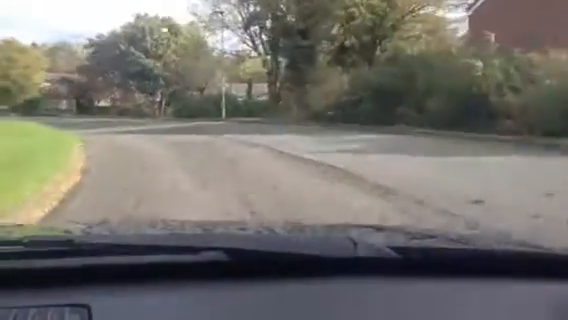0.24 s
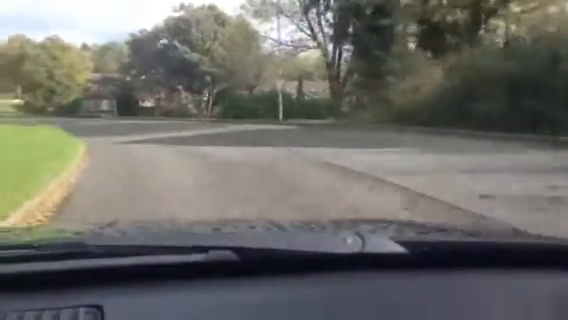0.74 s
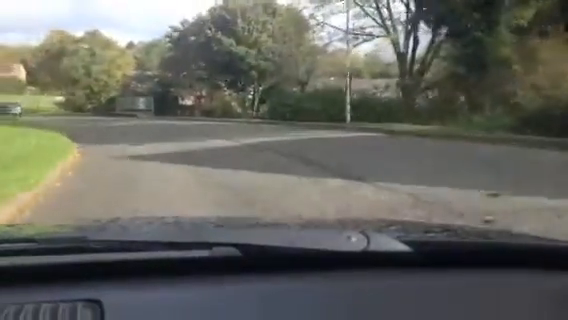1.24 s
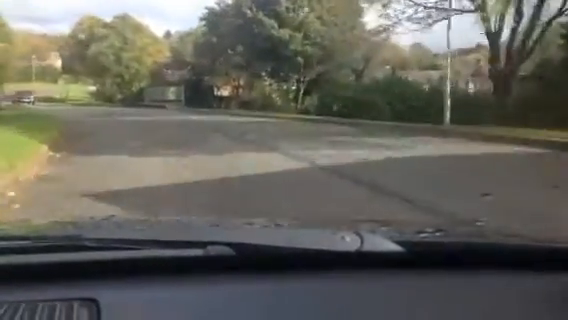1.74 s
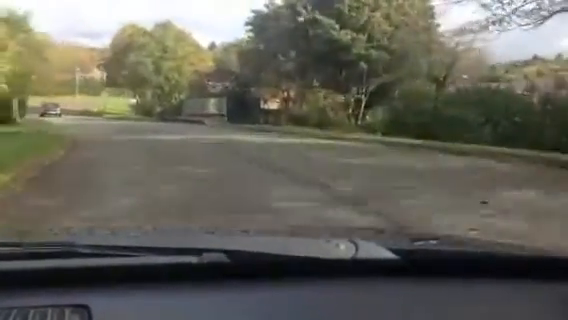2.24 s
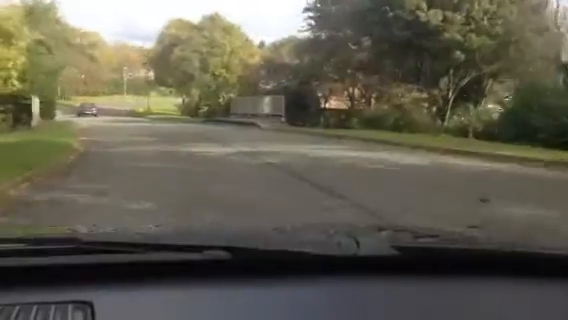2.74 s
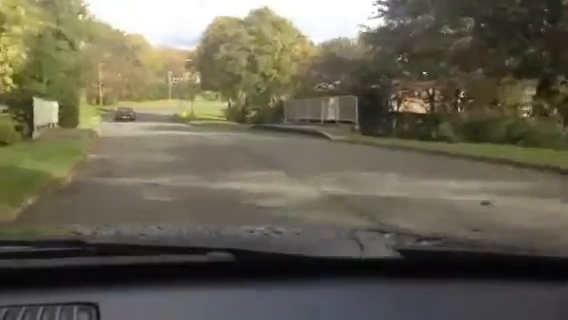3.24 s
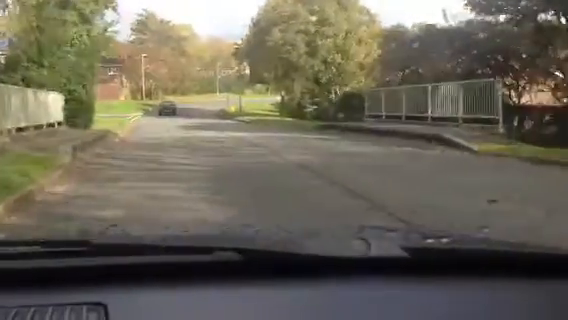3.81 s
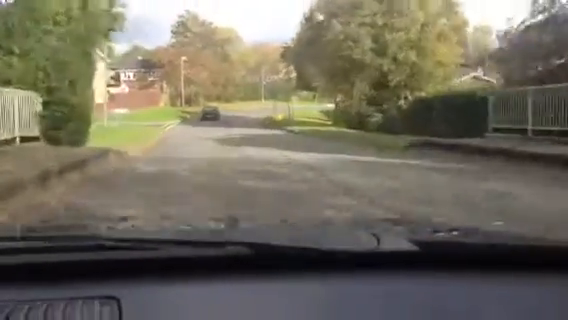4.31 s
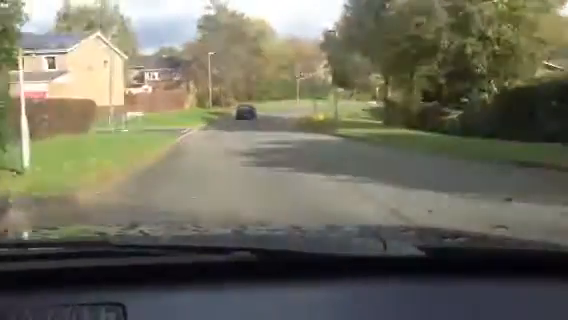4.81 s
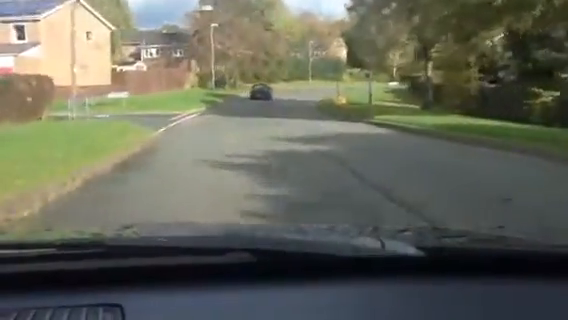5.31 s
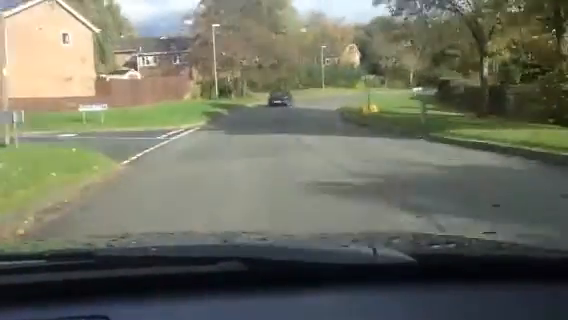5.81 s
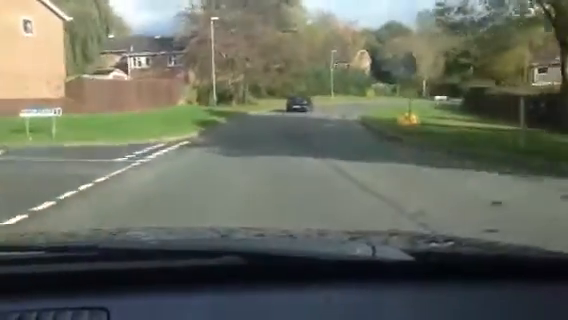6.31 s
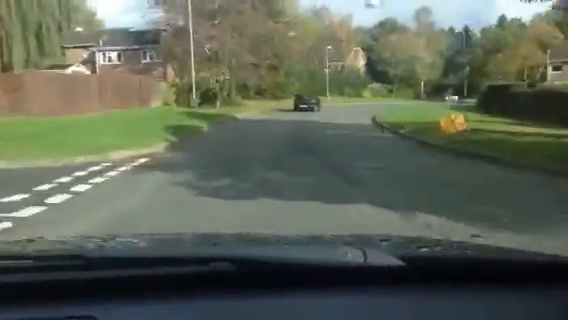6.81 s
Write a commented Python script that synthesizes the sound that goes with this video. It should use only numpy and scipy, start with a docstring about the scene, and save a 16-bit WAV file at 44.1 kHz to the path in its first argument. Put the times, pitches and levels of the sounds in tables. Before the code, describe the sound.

Inside a diesel car, close behind the dashboard, in one bass-heavy channel with faint steady hiss. From 0 to 1.5 s a throbbing low boom and tyre drumming dominate as the car rounds a bend, with soft rasps, dull taps and round thuds. Road noise surges near 1.6 s, a sharp tiny trim click comes at 1.75 s and a strong thud at 1.9 s; then the rumble eases. A thin breathy turbo whistle creeps up until 2.3 s, dips, then climbs steeply from 2.9 to 4.3 s with airy hiss, while the engine hum rises in pitch and growls. Thuds and a brighter click cluster around 4.1-4.7 s. The whistle slides down, flaring around 5.2 s, and fades by about 5.8 s, as a panel buzzes with the clattering engine. Load and pitch ease slightly to 7 s, with light rustles, seam thuds at 6.5 and 7 s, and a late dull tap.

```python
"""One hears tyres drumming a car cabin and thudding over seams, a diesel's hum and clatter, and a turbo
whistle that climbs and falls away, with taps, rasps, rustles and trim clicks close by. The car is a
turbodiesel gathering speed on a suburban road. Road, growl and hiss are shaped noise, the hum is a sum of
sines locked to the firings, the whistle is narrow noise on a moving pitch, and thuds are brief low cosines."""
import sys
import numpy as np
from scipy.fft import rfft, irfft, next_fast_len
from scipy.io import wavfile
from scipy.ndimage import uniform_filter1d, map_coordinates

SR = 44100
rng = np.random.default_rng(int(sys.argv[2]) if len(sys.argv) > 2 else 0)


def wav_out(sig):
    """Save sig, one row per channel (or a flat mono array), as 16-bit PCM at SR to the path in sys.argv[1]."""
    wavfile.write(sys.argv[1], SR, np.round(np.clip(np.atleast_2d(sig).T, -1, 1) * 32767).astype(np.int16))


N = 311346  # length in samples


def amp(db):
    """Level law: decibels to amplitude ratio."""
    return 10 ** (np.asarray(db) / 20)


def unit(x):
    """Normalization: scale to rms 1."""
    return x / np.sqrt(np.mean(x ** 2) + 1e-20)


def curves(rows):
    """Linear interpolation: one value per sample for each column after the time."""
    s, *columns = np.transpose(rows)
    return [np.interp(np.arange(N) / SR, s, column) for column in columns]


def wobble(rate):
    """Band-limited fluctuation: a smooth random curve of rms 1 through rate knots a second."""
    knots = rng.standard_normal(int(N * rate / SR) + 4)
    return unit(map_coordinates(knots, [np.arange(N) * rate / SR]))


def filtered(x, response):
    """Linear filtering: multiply the spectrum of x by a response of frequency."""
    m = next_fast_len(N + SR // 2)  # padded so that ringing does not wrap round
    return irfft(rfft(x, m) * response(np.fft.rfftfreq(m, 1 / SR)), m)[:N]


def colour(x, spectrum):
    """Spectral shaping: x through a (Hz, dB) curve, falling steeply beyond its last point, at rms 1."""
    f, db = np.transpose(spectrum)

    def response(hz):
        gain = amp(np.interp(np.log(hz + 1), np.log(f), db))
        return gain / np.maximum(hz / f[-1], 1) ** 6

    return unit(filtered(x, response))


def noise(spectrum):
    """Random excitation: coloured noise of rms 1."""
    return colour(rng.standard_normal(N), spectrum)


def steady(x, seconds):
    """Level equalization: divide x by its running rms, which evens out swells slower than the given time."""
    return x / np.sqrt(np.abs(uniform_filter1d(x ** 2, int(seconds * SR) + 1)) + 1e-9)


def swells(rows):
    """Gaussian envelopes: smooth swells from (s, dB, half length s) rows."""
    t = np.arange(N) / SR
    return sum(amp(db) * np.exp(-((t - s) / length) ** 2 / 2) for s, db, length in rows)


def resonate(x, modes):
    """Modal resonance: x plus narrow second-order modes given as (Hz, width Hz, dB over the rest)."""
    def response(f):
        return 1 + sum(amp(db) * 1j * f * w / (c ** 2 - f ** 2 + 1j * f * w) for c, w, db in modes)

    return filtered(x, response)


def whistle(hz, width_hz):
    """Narrow-band noise: random quadrature amplitudes make a breathy tone around a moving pitch."""
    phase = 2 * np.pi * np.cumsum(hz) / SR
    return unit(wobble(width_hz) * np.cos(phase) + wobble(width_hz) * np.sin(phase))


# Cabin air and panel resonances. Each row: frequency in Hz, width in Hz, level in dB over the rest.
CABIN_MODES = [(113.47, 5.6, 7.5), (188, 8.1, -18.5), (223.3, 6.3, -3.5), (747, 52, -12.5),
               (1049, 20, -5.5), (1310, 21, -7.5), (1523, 80, -6.5), (1725, 28, -1.5), (1904, 43, -3.5),
               (2100, 36, -1)]


def in_cabin(x):
    """Room modes: x coloured by the cabin's resonances, at rms 1."""
    return unit(resonate(x, CABIN_MODES))


# Engine speed, also the measure of road speed. Each row: time in seconds, firing rate in Hz.
FIRING_RATE = [(0, 55.7), (1.4, 56.6), (3.1, 62.47), (4.2, 70.3), (4.6, 73), (5.6, 72.1), (6.1, 72.05),
               (7.06, 68.6)]
# Roughness of the asphalt. Each row: time in seconds, roughness in dB.
ROUGHNESS = [(0, 0), (1, -0.5), (1.35, 0), (1.57, 2.5), (1.75, -4), (2, -3), (2.4, -6), (3.1, -7),
             (3.5, -6), (3.95, -6), (4.3, -3.5), (4.6, -6.5), (5, -10), (5.4, -5.5), (5.85, -9.5),
             (6.3, -7.5), (7.06, -3.5)]
# Low body shake. Each row: time in seconds, level in dB.
SHAKE_LEVEL = [(0, -27.5), (.9, -29.5), (1.25, -26.5), (1.65, -20), (2, -29.5), (2.5, -28), (3.05, -37.5),
               (3.5, -26), (3.8, -32.5), (4.45, -24.5), (4.9, -28), (5.45, -29.5), (5.75, -34.5),
               (7.06, -27.5)]
# Spectra of body shake, cabin boom, tyre drumming and tread roar. Each row: frequency in Hz, dB per Hz.
SHAKE_SPECTRUM = [(12, -35), (25, -6), (38, 3), (62, 10.5), (84, 10.5), (97, 2), (130, -34.5)]
BOOM_SPECTRUM = [(65, -22), (92, -12), (104, 2), (114, 2), (128, 3.5), (146, 0.5), (175, -29)]
DRUM_SPECTRUM = [(110, -17), (150, 1), (185, 2.5), (212, -3.5), (235, -8.5), (250, -9.5), (290, -15.5),
                 (330, -13.5), (385, -32.5), (480, -24.5), (800, -66.5)]
TREAD_SPECTRUM = [(280, -12.5), (350, -2), (430, -1), (520, -3.5), (620, -0.5), (725, -0.5), (785, -8.5),
                  (850, -1.5), (930, -4), (985, -12), (1050, -8.5), (1130, -20), (1500, -29.5),
                  (3000, -56.5)]
# levels at 0 dB of roughness, and the dB that each gains per dB of roughness
BOOM_DB, BOOM_GROWS = -17.5, 1.235
DRUM_DB, DRUM_GROWS = -23, 0.39
TREAD_DB, TREAD_GROWS = -36.5, 0.36
TREAD_DB_PER_OCTAVE = 3  # tread roar against road speed
FIRINGS_PER_TURN = 14  # engine firings in one wheel turn
# boom throb: first crest, depth at the start, time constant of its fading
THROB_S, THROB_DB, THROB_FADE_S = 0.15, 4, 2.2


def road():
    """Forced vibration: asphalt shakes the body, booms the air and drums the tyres; wheel turns throb it."""
    rough_db, = curves(ROUGHNESS)
    firing_hz, = curves(FIRING_RATE)
    shake_db, = curves(SHAKE_LEVEL)
    t = np.arange(N) / SR

    turns = np.cumsum(firing_hz) / SR / FIRINGS_PER_TURN
    turns_from_crest = turns - np.interp(THROB_S, t, turns)
    throb_db = THROB_DB * np.exp(-t / THROB_FADE_S) * np.cos(2 * np.pi * turns_from_crest)
    speed_db = TREAD_DB_PER_OCTAVE * np.log2(firing_hz / firing_hz.max())

    shake = amp(shake_db + 1.9 * wobble(5.1)) * steady(noise(SHAKE_SPECTRUM), seconds=0.48)

    boom_db = BOOM_DB + BOOM_GROWS * rough_db + throb_db + wobble(10)
    boom = amp(boom_db) * steady(in_cabin(noise(BOOM_SPECTRUM)), seconds=0.11)

    drum_db = DRUM_DB + DRUM_GROWS * rough_db + 1.54 * wobble(45)
    drum = amp(drum_db) * steady(in_cabin(noise(DRUM_SPECTRUM)), seconds=0.17)

    tread_db = TREAD_DB + TREAD_GROWS * rough_db + speed_db + 0.76 * wobble(20)
    tread = amp(tread_db) * in_cabin(noise(TREAD_SPECTRUM))
    return shake + boom + drum + tread


def thud(s, db, hz, length):
    """Damped impact: a soft tyre rolls onto an edge, and a few low cycles swell and die."""
    first = max(int((s - 4 * length) * SR), 0)
    last = min(int((s + 4 * length) * SR), N)
    near = np.arange(first, last)
    t = near / SR - s
    out = np.zeros(N)
    out[near] = amp(db) * np.exp(-((t - length / 4) / length) ** 2) * np.cos(2 * np.pi * hz * t)
    return out


# Thuds of tyres and suspension on uneven road.
# Each row: time in seconds, envelope peak in dB, pitch in Hz, length in seconds.
SEAM_THUDS = [(0.145, -12.5, 111, 0.032), (0.594, -5, 127, 0.0035), (.733, -15, 189, 0.015),
              (1.047, -9.5, 115, 0.021), (1.385, -8.5, 108, 0.018), (1.862, -2.5, 121, 0.014),
              (2.665, -12.5, 120, 0.014), (2.816, -15.5, 130, 0.011), (3.61, -19, 190, 0.013),
              (3.698, -13.5, 125, 0.017), (4.144, -7, 151, 0.0045), (4.244, -9, 122, 0.0091),
              (4.27, -5, 180, 0.0054), (4.272, -19.5, 346, 0.0083), (4.313, -5, 126, 0.0031),
              (4.449, -16, 140, 0.0039), (4.503, -6.5, 84.4, 0.0024), (4.574, -14.5, 165, 0.0037),
              (4.655, -15, 179, 0.0039), (4.859, -13.5, 131, .004), (4.912, -16.5, 150, 0.0059),
              (5.113, -13, 194, 0.014), (5.445, -17.5, 84, 0.038), (5.535, -23, 296, .006),
              (5.561, -22, 270, .008), (5.78, -13.5, 141.1, .005), (5.992, -11, 85, 0.007),
              (6.182, -16, 148, .018), (6.548, -8.5, 127, 0.0098), (6.969, -8.5, 125.6, 0.009)]
# small thuds: rate, then mean level and pitch, and length
PATTER_PER_S, PATTER_DB, PATTER_HZ, PATTER_LENGTH_S = 9, -23, 157, 0.0044


def bumps():
    """Impact excitation: seams thud one by one, and small flaws in the asphalt patter at random times."""
    seams = sum(thud(*row) for row in SEAM_THUDS)
    flaws = rng.random(size=(200, 3))[:int(PATTER_PER_S * N / SR)]
    patter = np.zeros(N)
    for when, strength, pitch in flaws:
        db = PATTER_DB + 8 * (strength - .5)
        hz = PATTER_HZ * 2 ** (pitch - .5)  # within half an octave either way
        patter += thud(when * N / SR, db, hz, PATTER_LENGTH_S)
    return seams + patter


# Engine load. Each row: time in seconds, load in dB.
ENGINE_LOAD = [(0, -7), (.5, -10), (.75, -8), (1.15, -8.5), (1.4, -5), (2.6, -5), (3.5, -3.5), (4.1, -2.5),
               (4.4, 0), (4.65, -1.1), (5.28, .5), (5.5, -0.55), (6.15, -2), (6.35, -2.5), (7.06, -3)]
# Orders of the hum. Each row: multiple of the firing rate, level in dB relative to the hum.
HUM_ORDERS = [(.5, -16), (1, 0.5), (1.5, -14.5), (2, -7.5), (2.5, -14), (3, -11.5)]
# Spectra of clatter through the bulkhead and of combustion growl. Each row: frequency in Hz, dB per Hz.
CLATTER_SPECTRUM = [(500, -20), (1000, 4.5), (1170, -4.5), (1290, 3), (1750, 1), (1830, -3.5), (2080, -4),
                    (2350, -5.5), (2520, -7), (2900, -13.5), (4000, -17.5), (8000, -47.5)]
GROWL_SPECTRUM = [(200, -22), (370, 2), (480, -3), (660, -2), (780, -3.5), (1000, -8.5), (1300, -13.5)]
# levels at 0 dB of load, and the dB that each gains per dB of load
HUM_DB, HUM_GROWS = -26.5, 2.4
GROWL_DB, GROWL_GROWS = -38.5, 2.64
CLATTER_DB = -42  # gains 1 dB per dB
GRAIN_DB, GRAINS_PER_S = 1, 320  # uneven grain within the clatter
BURST_SHARE = .35  # decay constant of a burst, as a share of a firing period


def engine():
    """Periodic excitation: each firing pushes the air and sets off uneven diesel clatter; load adds growl."""
    firing_hz, = curves(FIRING_RATE)
    load_db, = curves(ENGINE_LOAD)
    cycles = np.cumsum(firing_hz * (1 + .009 * wobble(8))) / SR

    hum = np.zeros(N)
    for multiple, db in HUM_ORDERS:
        hum += amp(db + 2.1 * wobble(8.7)) * np.sin(2 * np.pi * (multiple * cycles + rng.random()))

    # the four cylinders differ in strength, and no two firings are alike
    firing = cycles.astype(int)
    cylinder_db = 1.4 * rng.standard_normal(size=4)[firing % 4]
    firing_db = 5 * np.clip(rng.standard_normal(size=1000), -2, 1.2)[firing]
    bursts = 1 + 0.5 * amp(cylinder_db + firing_db) * np.exp(-(cycles % 1) / BURST_SHARE)

    grain = amp(0.9 * wobble(40) + GRAIN_DB * wobble(GRAINS_PER_S))
    clatter = in_cabin(colour(bursts * grain * rng.standard_normal(N), CLATTER_SPECTRUM))
    growl = colour(bursts * rng.standard_normal(N), GROWL_SPECTRUM)

    loud_hum = amp(HUM_DB + HUM_GROWS * load_db) * hum
    loud_clatter = amp(CLATTER_DB + load_db) * clatter
    loud_growl = amp(GROWL_DB + GROWL_GROWS * load_db) * growl
    return loud_hum + loud_clatter + loud_growl + panel(bursts)


# Modes of a bulkhead panel. Each row: frequency in Hz, relative level in dB.
PANEL_MODES = [(843, 0), (872, -7.5), (903, -5.5), (1040, -14.5), (1080, -17.5)]
# Spectrum of the ringing panel. Each row: frequency in Hz, dB per Hz.
PANEL_SPECTRUM = [(600, -32), (790, -13), (825, -9.5), (850, -0.5), (885, -5), (920, -3.5), (955, -11.5),
                  (1000, -11.5), (1250, -28)]
# The panel's ring. Each row: time in seconds, level in dB.
PANEL_LEVEL = [(0, -44.5), (.9, -45), (1.5, -47), (2.6, -47.5), (3.4, -44), (4.1, -46.5), (4.34, -39),
               (4.46, -36), (4.56, -50), (4.83, -36.5), (5.03, -44.5), (5.22, -39), (5.39, -38.5),
               (5.5, -48), (5.67, -36), (5.76, -43), (5.85, -36.5), (5.92, -48), (6.4, -44.5), (7.06, -47)]


def panel(bursts):
    """Plate vibration: firings shake a bulkhead panel whose modes swell independently, so the ring shifts."""
    ring = np.zeros(N)
    for hz, db in PANEL_MODES:
        mode = whistle(hz * (1 + .006 * wobble(5)), width_hz=30)
        ring += amp(db + 3.3 * wobble(8.4)) * mode
    rattle = colour(bursts * rng.standard_normal(N), PANEL_SPECTRUM)
    level_db = curves(PANEL_LEVEL)[0] + 0.48 * wobble(22)
    return amp(level_db) * steady(ring + amp(-3.5) * rattle, seconds=0.13)


# Turbo speed. Each row: time in seconds, whistle pitch in Hz.
WHISTLE_PITCH = [(0, 3400), (.7, 3554), (1.1, 3630), (1.6, 3740), (2.28, 3800), (2.42, 3480), (2.7, 3430),
                 (2.92, 3650), (3.25, 4126), (3.55, 4750), (3.9, 5380), (4.1, 5590), (4.3, 5730),
                 (4.5, 5470), (4.65, 5080), (4.95, 5000), (5.17, 4200), (5.4, 3734), (5.9, 3350),
                 (7.06, 3149)]
# Whistle strength ahead of the resonances. Each row: time in seconds, gain in dB.
WHISTLE_LEVEL = [(0, -83), (.6, -74), (1, -64.5), (2.28, -65), (2.42, -72), (2.72, -76), (2.88, -64),
                 (3.3, -63.5), (3.6, -66), (3.95, -70), (4.1, -76), (4.45, -68), (4.7, -66), (4.97, -64),
                 (5.08, -61), (5.25, -59), (5.55, -63), (5.8, -73), (6.35, -69), (6.55, -81), (7.06, -78)]
# Resonances that make the gliding whistle flare, then narrow ones of the intake pipework.
# Each row: frequency in Hz, width in Hz, level in dB over the rest.
WHISTLE_FLARES = [(3640, 60, -7), (3830, 50, -6), (4130, 35, -.5), (4830, 40, -12), (5605, 60, 5)]
PIPE_MODES = [(3490, 45, -1.5), (3642, 45, 2), (3817, 47, -3), (4132, 25, 3), (4826, 35, 0), (5050, 50, -9),
              (5598, 45, 1.5), (5810, 40, -7.5), (6004, 60, 0), (6340, 70, -4)]
# Spectra of the intake rush and the boost hiss. Each row: frequency in Hz, dB per Hz.
RUSH_SPECTRUM = [(2400, -9.5), (2800, -6), (2950, -7), (3200, 2), (3700, -2.5), (4000, -4.5), (5000, -9),
                 (6200, -14), (7000, -15), (10000, -21.5)]
BOOST_SPECTRUM = [(3000, -18.5), (4600, -0.5), (5600, 4.5), (6300, 1.5), (7000, -6.5), (9000, -14),
                  (12500, -10), (15500, -15.5)]
# boost builds above this whistle pitch and levels off over this span
BOOST_FROM_HZ, BOOST_SPAN_HZ = 3440, 1200
# intake rush and upper tone at top speed, boost hiss at full boost; pipes then add to rush and hiss
RUSH_DB, BOOST_DB, UPPER_DB = -54.5, -58.5, -72.5
FLUTTER, FLUTTER_DB = .007, 1.5  # rms flutter of pitch (as a fraction) and of level
CORE_DB, CORE_WIDTH_HZ = -2.5, 200
SKIRT_DB, SKIRT_WIDTH_HZ = -2, 700


def turbo():
    """Aeroacoustic tone: the compressor whistles with its speed and flares at resonances; boost adds hiss."""
    pitch_hz, = curves(WHISTLE_PITCH)
    speed = pitch_hz / pitch_hz.max()
    boost = np.tanh(np.maximum(pitch_hz - BOOST_FROM_HZ, 0) / BOOST_SPAN_HZ)
    pitch_hz = pitch_hz * (1 + FLUTTER * wobble(25))

    # a narrow core sits in a breathy skirt
    core = amp(CORE_DB) * whistle(pitch_hz, CORE_WIDTH_HZ)
    skirt = amp(SKIRT_DB) * whistle(pitch_hz, SKIRT_WIDTH_HZ)
    tone_db = curves(WHISTLE_LEVEL)[0] + FLUTTER_DB * wobble(20)
    tone = amp(tone_db) * resonate(core + skirt, WHISTLE_FLARES)

    # the steep power keeps the thin upper tone to the highest speeds
    upper = amp(UPPER_DB + 1.5 * wobble(12)) * speed ** 9 * whistle(2.31 * pitch_hz, width_hz=650)
    rush = amp(RUSH_DB) * speed * noise(RUSH_SPECTRUM)
    hiss = amp(BOOST_DB) * boost * noise(BOOST_SPECTRUM)
    return resonate(tone + rush + hiss, PIPE_MODES) + upper


# Dull taps. Each row: start in seconds, level in dB before the onset ramp, pitch in Hz, 60 dB decay in seconds.
TAPS = [(.821, -26, 840, .05), (.869, -26, 698, .06), (1.32, -23.5, 640, 0.055), (4.617, -26, 856, 0.046),
        (6.893, -29, 899, .05)]


def knocks():
    """Free decay: something loose in the dashboard gives a dull tap, a sine that dies exponentially."""
    out = np.zeros(N + SR)
    t = np.arange(SR // 4) / SR
    onset = 1 - np.exp(-t / .001)
    for s, db, hz, t60 in TAPS:
        tap = amp(db - 60 * t / t60) * onset * np.sin(2 * np.pi * hz * t)
        out[round(s * SR):][:len(t)] += tap
    return out[:N]


# Soft rasps. Each row: middle in seconds, level in dB, half length in seconds.
RASP_SWELLS = [(.31, -56, 0.016), (.57, -51, .025), (.78, -50, 0.022), (1.05, -48, .022),
               (1.315, -48.5, .02)]
# Spectrum of a rasp. Each row: frequency in Hz, dB per Hz.
RASP_SPECTRUM = [(900, -18.5), (1350, 6), (1700, 1.5), (2200, -12.5)]


def rasps():
    """Friction noise: a soft rasp returns about once a wheel turn as the car rounds the bend."""
    grain = amp(2 * wobble(250))
    return swells(RASP_SWELLS) * colour(rng.standard_normal(N) * grain, RASP_SPECTRUM)


# Rustles. Each row: middle in seconds, level in dB, half length in seconds.
RUSTLE_SWELLS = [(0.093, -66.5, 0.034), (0.447, -57.5, 0.0099), (0.901, -63, 0.026), (0.999, -62, 0.012),
                 (1.116, -60, .027), (1.378, -63, 0.0081), (1.447, -63.5, 0.028), (1.596, -62.5, .013),
                 (4.328, -60.5, .03), (4.46, -58, 0.046), (4.776, -59, .04), (5.444, -58, 0.15),
                 (5.566, -60.5, 0.071), (5.765, -60.5, 0.018), (6.278, -63.5, .04), (6.411, -61, 0.05),
                 (6.867, -60, 0.033), (6.978, -58, 0.025)]
# Spectrum of a rustle. Each row: frequency in Hz, dB per Hz.
RUSTLE_SPECTRUM = [(2000, -11), (5000, -1), (8000, -3.5), (10000, -7), (13000, -8.5), (15500, -12)]


def rustles():
    """Amplitude-modulated noise: short, light brushes with a fine grain."""
    grain = amp(1.9 * wobble(500))
    return swells(RUSTLE_SWELLS) * colour(rng.standard_normal(N) * grain, RUSTLE_SPECTRUM)


# Trim clicks. Each row: start in seconds, starting level in dB, 60 dB decay in seconds.
TRIM_CLICKS = [(.622, -54, .006), (.922, -42.5, 0.011), (1.368, -52.5, .012), (1.753, -35.5, 0.0014),
               (1.949, -54, .006), (3.441, -49.5, .006), (4.094, -56, .006), (4.24, -46, .055),
               (4.521, -56, 0.0092), (5.119, -53, 0.013), (5.258, -54.5, 0.019), (5.875, -53.5, 0.022)]
# Spectrum of a click. Each row: frequency in Hz, dB per Hz.
CLICK_SPECTRUM = [(1500, -18.5), (3500, -6), (5500, -2.5), (8000, -1.5), (11000, -5.5), (15500, -4)]


def clicks():
    """Transient noise: plastic trim snaps, each a bright crack under a fast exponential decay."""
    envelope = np.zeros(N + SR)
    t = np.arange(SR // 8) / SR
    for s, db, t60 in TRIM_CLICKS:
        envelope[round(s * SR):][:len(t)] += amp(db - 60 * t / t60)
    return envelope[:N] * noise(CLICK_SPECTRUM)


# Spectrum of the background hiss. Each row: frequency in Hz, dB per Hz.
HISS_SPECTRUM = [(2000, 1), (6500, -1.5), (9000, -5.5), (13000, -4.5), (15500, -7)]


def background_hiss():
    """Stationary noise: a faint even hiss."""
    return amp(-65.5) * noise(HISS_SPECTRUM)


def scene():
    """Superposition: everything heard from behind the dashboard, over the hiss."""
    car = road() + bumps() + engine() + turbo()
    close_by = knocks() + rasps() + rustles() + clicks()
    return car + close_by + background_hiss()


TOP_HZ = 15450  # band limit


def record(dry):
    """Band limitation: an ideal low-pass keeps nothing above the limit, on one channel."""
    return filtered(dry, lambda hz: hz < TOP_HZ)[None]


dry = scene()
out = record(dry)
wav_out(out)
```